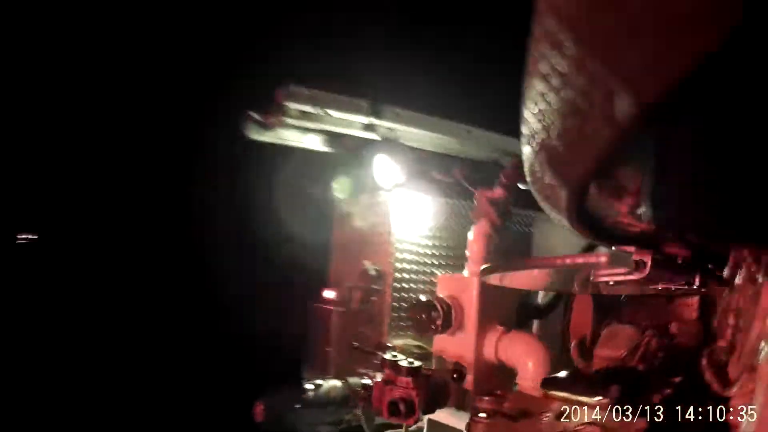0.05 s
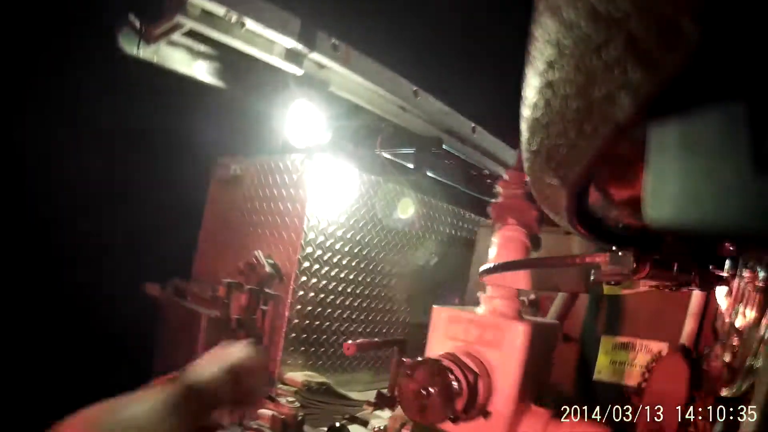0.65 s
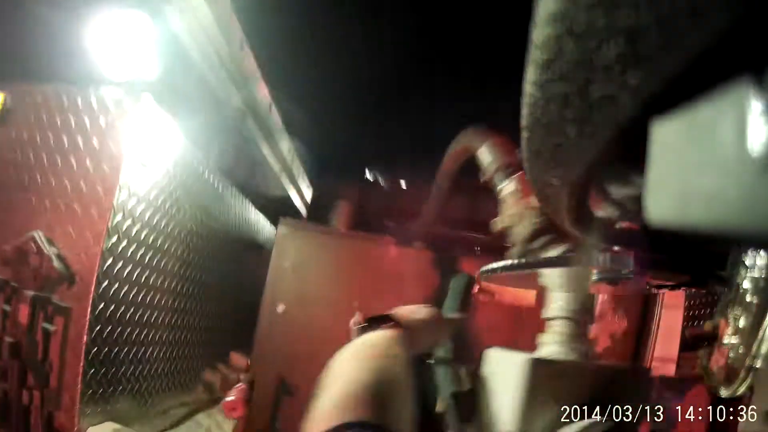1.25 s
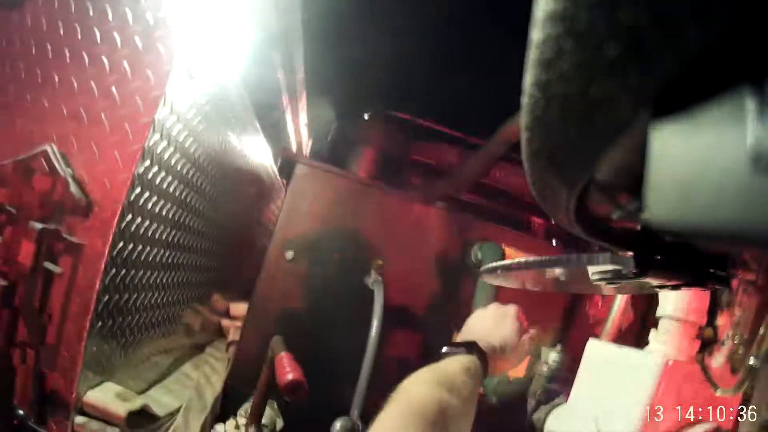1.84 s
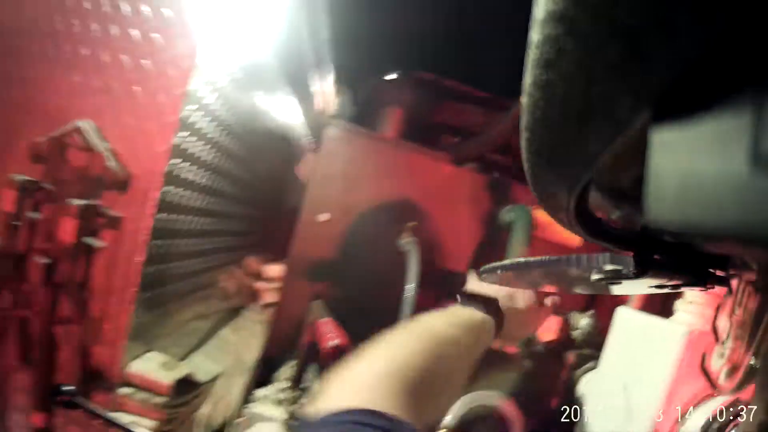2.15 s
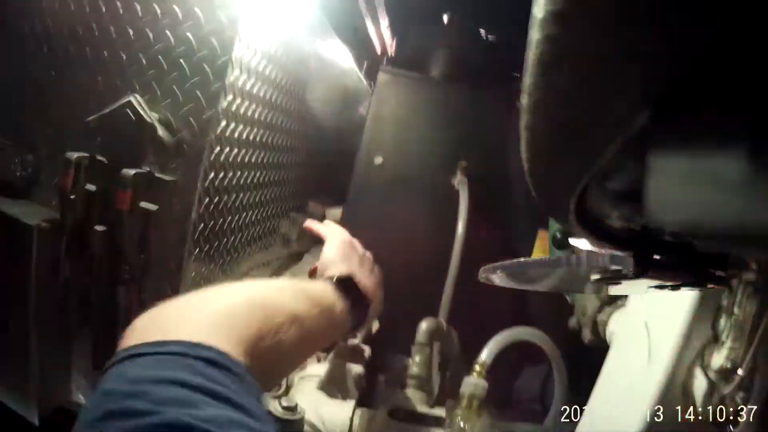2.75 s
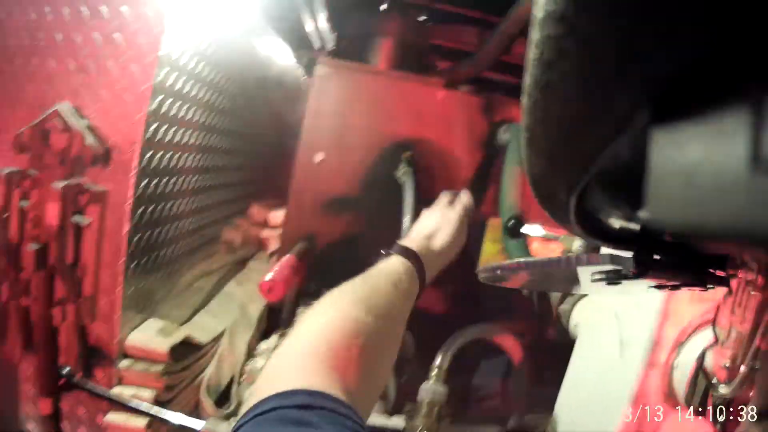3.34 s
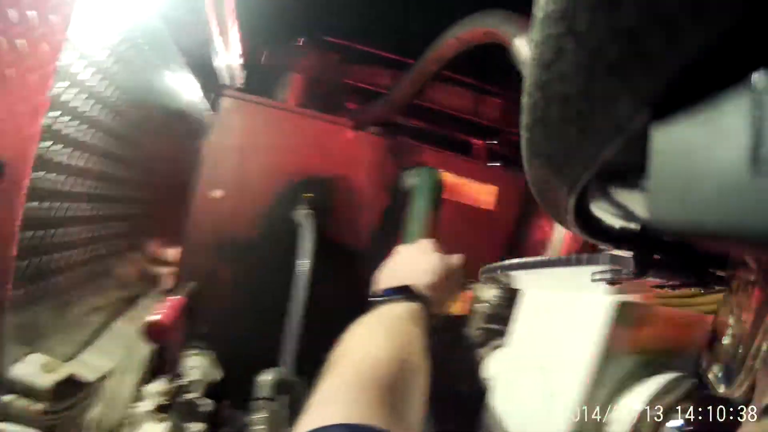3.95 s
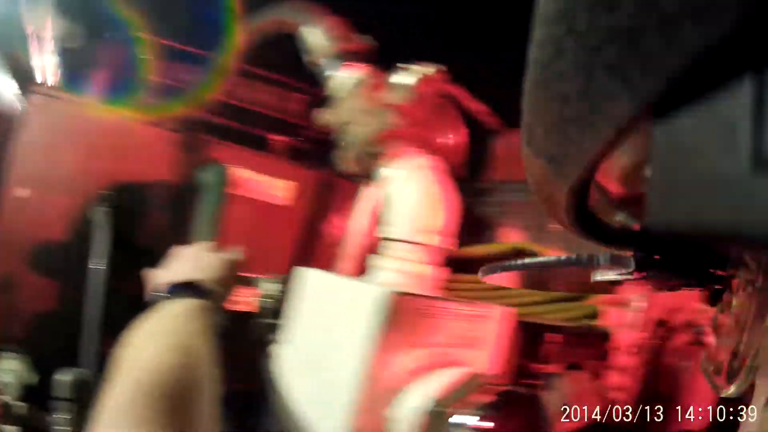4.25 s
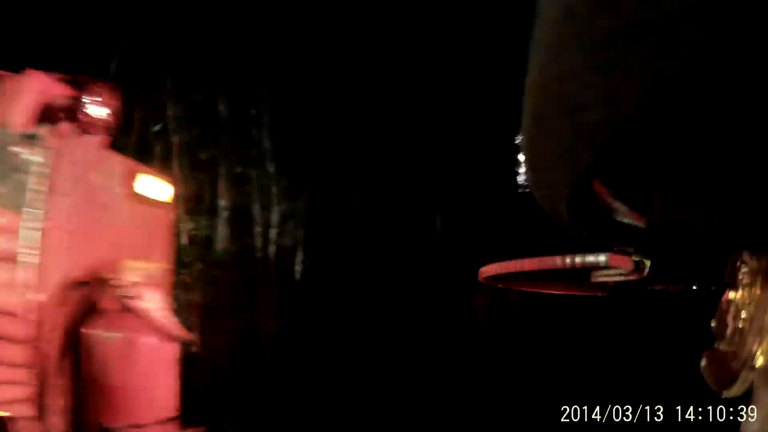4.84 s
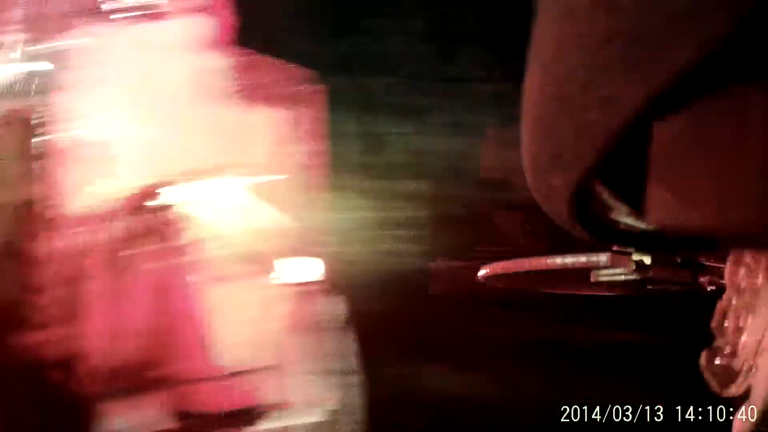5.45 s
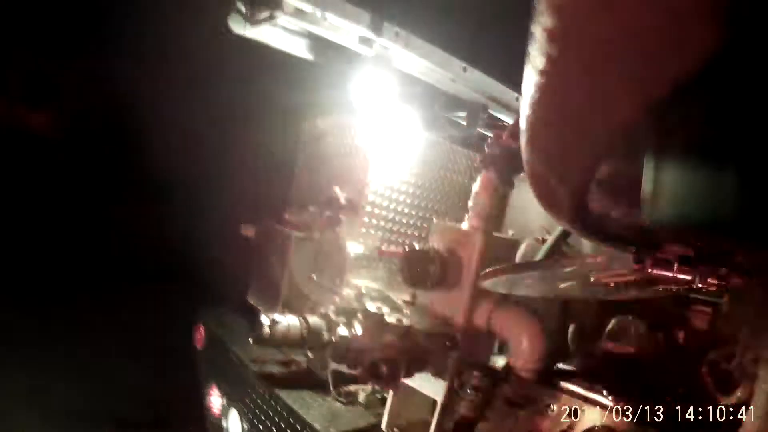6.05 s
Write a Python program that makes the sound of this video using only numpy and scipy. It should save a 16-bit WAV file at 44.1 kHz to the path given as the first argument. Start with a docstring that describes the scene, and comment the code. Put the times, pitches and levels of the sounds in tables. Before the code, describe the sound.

A small pump engine on a fire truck runs outdoors for the whole six seconds, close to a body-worn microphone. It holds one speed, making a loud, low, throbbing drone with fast metallic clatter, rushing air and a faint jingle of loose fittings. A faint hum from the pump fades by about 1.3 seconds. From then until about 4.5 seconds the engine sounds duller and its clatter softer, though the drone stays just as loud. Tiny clinks come at about 0.6 and 2.3 seconds. Around 5 seconds the exhaust gets raspier and the clatter brighter, with several light metal clinks between 4.8 and 5.6 seconds. From about 5.5 to 6 seconds gear bumps the microphone housing in a quick cluster of short, hollow knocks, the sharpest at about 5.8 seconds, while the engine runs on.

```python
"""A V-twin fire pump engine runs at a steady 2900 rpm on the back of a truck, outdoors.
Uneven firings throb in the muffler; firing knocks, valve gear and rushing air ring the engine's metal.
Loose fittings jingle and churning water rings the pump body. The body-worn microphone leans in beside
the pump, where the truck screens the engine, then swings away; loose gear knocks against its housing."""
import sys
import numpy as np
from scipy import signal
from scipy.fft import rfft, irfft
from scipy.io import wavfile
from scipy.ndimage import uniform_filter1d, map_coordinates

SR = 44100
rng = np.random.default_rng(int(sys.argv[2]) if len(sys.argv) > 2 else 0)


def wrap_up_sound(samples):
    """Save the sound to the file named by the first command line argument, as 16-bit audio."""
    columns = np.atleast_2d(samples).T
    # keep every value between -1 and 1, then stretch to whole-number steps
    tamed = np.clip(columns, -1, 1)
    steps = np.round(tamed * 32767).astype(np.int16)
    wavfile.write(sys.argv[1], SR, steps)


N = 273420
T = np.arange(N) / SR
FREQ_HZ = np.maximum(np.fft.rfftfreq(N, 1 / SR), 1)
TWIN_LAG_CYCLES = 450 / 720  # second cylinder fires 450 crank degrees after the first

# Engine speed. Each row: time in seconds, four-stroke cycle rate in Hz.
CYCLE_RATE = [(0, 24.28), (.7, 24.13), (1.3, 24.2), (1.9, 24.18), (2.5, 24.13), (4.0, 24.15), (4.7, 24.19),
              (5.3, 24.14), (6.2, 24.16)]
# Cover and pipe resonances, plus one dip. Each row: centre in Hz, width in Hz, gain at centre in dB.
COVER_MODES = [(675, 68, -5), (1342, 34, 6), (1426.5, 36, 7), (2665, 64, 4.5), (3160, 140, 4),
               (4960, 80, 1), (5500, 92, 0.5), (8400, 130, 4.5), (9800, 260, 3)]


def exhaust(cycles, bark_db, twin_share=0.4, screened_db=-41.5, open_db=-30.5,
            waver_db=0.72, flutter_db=2.5, smear_rad=2.9):
    """A strong and a weak pulse per cycle drive the muffler; high orders come out in the open. Rms 1."""
    # Note screened by the truck. Each row: multiple of the cycle rate, relative level in dB.
    screened_orders = [(1, -31.5), (2, -6.5), (3, -6.5), (4, -19), (5, 2.5), (6, -2), (7, -10), (8, -14),
                       (9, -28.5), (10, -29.5), (11, -31.5), (12, -51), (13, -31), (14, -25.5), (15, -34.5),
                       (16, -45), (17, -36.5), (18, -37.5), (19, -42), (20, -55.5), (21, -58), (22, -41.5)]
    # Note in the open. Each row: multiple of the cycle rate, relative level in dB.
    open_orders = [(1, -26.5), (2, -5), (3, -5), (4, -18.5), (5, 2), (6, -3.5), (7, -11.5), (8, -6),
                   (9, -20), (10, -13.5), (11, -11.5), (12, -49), (13, -16), (14, -24), (15, -48.5),
                   (16, -24.5), (17, -52.5), (18, -30.5), (19, -36), (20, -43), (21, -50), (22, -32)]
    # Muffler resonances, setting phase only. Each row: centre in Hz, width in Hz.
    muffler_modes = [(51, 55), (140, 60), (310, 30)]
    openness = np.clip((bark_db - screened_db) / (open_db - screened_db), 0, 1.15)
    cycle_hz = np.mean(np.array(CYCLE_RATE)[:, 1])
    burn_strength = walk(24)  # no two burns are alike
    note = 0
    for (order, behind_db), (_, clear_db) in zip(screened_orders, open_orders):
        height = order / len(open_orders)
        s = 1j * order * cycle_hz
        response = -s ** 2 * (1 + twin_share * np.exp(-2j * np.pi * order * TWIN_LAG_CYCLES))
        for hz, width_hz in muffler_modes:
            response /= s ** 2 + width_hz * s + hz ** 2
        # short waves bounce round the truck and drift in phase as the microphone moves
        drift_rad = smear_rad * height ** 2 * walk(1.527)
        db = behind_db + openness * (clear_db - behind_db)
        db = db + waver_db * burn_strength + flutter_db * height * walk(12)
        note = note + undb(db) * np.cos(2 * np.pi * order * cycles + np.angle(response) - drift_rad)
    six_cycle_rms = np.sqrt(uniform_filter1d(note ** 2, int(6 * SR / cycle_hz)))
    return note / six_cycle_rms


def clatter(cycles, slop_s=.00018, scatter_db=3.0, t60_s=0.075, rattle_db=4, rattle_cycles=.24):
    """Each blow rings its own part of the engine, slightly early or late, and rattles loose parts."""
    # Two firings, then valve gear. Each row: delay after the strong firing in cycles, relative level in dB.
    blows = [(0.032, -9.5), (.67, 2), (.19, 1.5), (.87, 2.5), (.56, -3), (.37, -6)]
    # Spectrum of the engine's metal. Each row: frequency in Hz, relative level in dB.
    metal_spectrum = [(120, -10.5), (230, 7.5), (400, -3.5), (560, -12), (680, -10), (850, -7.5), (1200, 2),
                      (1550, 2), (2050, -6.5), (2430, -24.5), (2800, -19), (3300, -20), (3800, -28.5),
                      (5450, -26), (5900, -37.5), (11000, -50.5)]
    t = T[:SR // 12]
    whole_cycles = np.arange(int(cycles[-1]) + 1)
    rings, shake = 0, 0
    for delay_cycles, db in blows:
        lateness, strength = rng.standard_normal((len(whole_cycles), 2)).T
        due_s = np.interp(whole_cycles + delay_cycles, cycles, T, right=2 * T[-1])
        starts = ((due_s + slop_s * lateness) * SR).astype(int)
        inside = (starts >= 0) & (starts < N)
        hits = np.bincount(starts[inside], undb(db + scatter_db * strength)[inside], N)
        ring = rng.standard_normal(len(t)) * decay(t, t60_s)
        rings = rings + signal.fftconvolve(hits, ring)[:N]
        shake = shake + undb(2 * db) * np.exp(-((cycles - delay_cycles) % 1) / rattle_cycles)
    rattle = np.sqrt(shake) * undb(1.1 * walk(45)) * rng.standard_normal(N)
    vibration = unit(rings) + undb(rattle_db) * unit(rattle)
    return unit(colour(vibration, metal_spectrum, COVER_MODES))


def gas_puffs(cycles, decay_cycles=0.45):
    """A turbulent puff leaves the outlet after each firing."""
    # Outlet noise. Each row: frequency in Hz, relative level in dB.
    gas_spectrum = [(25, -15), (90, 3.5), (210, 3), (300, 4.5), (450, -6), (560, -8), (680, -14),
                    (780, -12.5), (1100, -17), (2500, -35), (8000, -60.5)]
    first = np.exp(-(cycles % 1) / decay_cycles)
    second = np.exp(-((cycles - TWIN_LAG_CYCLES) % 1) / decay_cycles)
    return unit(colour((first + second) * rng.standard_normal(N), gas_spectrum))


def tailpipe_growl(cycles, hz=460, width_hz=220, level_db=-43, facing_s=5, spread_s=0.36):
    """Gas puffs ring the tailpipe, swelling as the microphone passes its mouth."""
    facing = np.exp(-.5 * ((T - facing_s) / spread_s) ** 2)
    return undb(level_db) * facing * resonate(gas_puffs(cycles), hz, width_hz)


def cooling_air(cycles, pulse_db=1.35, flicker_db=2.0):
    """Air rushes through the fins, swelling slightly once a cycle."""
    # Fin noise. Each row: frequency in Hz, relative level in dB.
    air_spectrum = [(700, 9), (1100, 18.5), (1500, 23), (2050, 22), (2450, 4), (2900, 8), (3850, 0.5),
                    (5400, 3), (5900, 0.5), (6500, 0.5), (8000, -9.5), (10000, -10.5), (11500, -18),
                    (15000, -16.5)]
    swell_db = pulse_db * np.cos(2 * np.pi * cycles) + flicker_db * walk(30)
    return unit(colour(rng.standard_normal(N) * undb(swell_db), air_spectrum, COVER_MODES))


def housing_knocks(scuff_db=-3, scuff_t60_s=0.057, low_cut_hz=480, rebound_s=.0095, rebound_db=-12):
    """Gear rings the microphone housing, scuffs it and rebounds once; softer contact is duller."""
    # Bumps. Each row: start in seconds, peak in dB, contact low-pass corner in Hz.
    bumps = [(5.554, -23, 2500), (5.663, -22.5, 2500), (5.692, -17, 5000), (5.751, -16.5, 2000),
             (5.8405, -17, 1790), (5.8465, -6.5, 3040), (5.865, -21.5, 900), (5.906, -21.5, 300),
             (6.048, -15, 5000)]
    # Housing modes. Each row: frequency in Hz, relative level in dB, T60 in seconds.
    housing_modes = [(598, 5.5, 0.033), (673, 7, 0.02), (785, 4, 0.13), (995, 2.5, .03), (1277, 7, 0.054),
                     (1395, 8.5, 0.031), (1540, 3.5, .03), (1716, 5.5, 0.031), (1960, 2, 0.024),
                     (2750, -7.5, 0.018), (4860, -2.5, 0.013)]
    t = T[:SR // 6]
    out = np.zeros(N + len(t))
    ring = sum((-1) ** k * undb(db) * decay(t, t60_s) * np.sin(2 * np.pi * hz * t)
               for k, (hz, db, t60_s) in enumerate(housing_modes))
    low_cut = signal.butter(4, low_cut_hz, "high", fs=SR, output="sos")  # small shell, no bass
    for start_s, peak_db, corner_hz in bumps:
        contact = signal.butter(1, corner_hz, fs=SR)
        for bounce in range(2):
            scuff = undb(scuff_db) * rng.standard_normal(len(t)) * decay(t, scuff_t60_s)
            shell = signal.sosfilt(low_cut, ring + scuff)
            bump = signal.lfilter(*contact, signal.lfilter(*contact, shell))
            place(out, bump, start_s + bounce * rebound_s, peak_db + bounce * rebound_db)
    return out[:N]


def whine(cycles, order=56, throb_db=3.5, waver_db=5.5, wander_rad=0.73):
    """A thin metallic note locked to the crankshaft throbs once a cycle and wavers."""
    db = throb_db * np.cos(2 * np.pi * cycles) + waver_db * walk(9)
    return unit(undb(db) * np.sin(2 * np.pi * order * cycles + wander_rad * walk(8)))


def pump_hum(hz=774, width_hz=60, level_db=-49, screened_s=1.22, fade_s=.25):
    """Churning water rings the pump body; it fades as the microphone leans past the front."""
    in_view = np.clip((screened_s - T) / fade_s + .5, 0, 1)
    return undb(level_db) * in_view * resonate(rng.standard_normal(N), hz, width_hz)


def chinks(t60_s=0.078, chatter_s=0.0081, chatter_db=-20):
    """A shaken fitting strikes, chatters briefly and rings on at one pitch."""
    # Loudest strikes. Each row: start in seconds, pitch in Hz, peak in dB.
    strikes = [(.63, 3160, -42), (2.312, 3160, -42.5), (4.82, 2665, -44), (5.14, 2665, -41),
               (5.271, 2665, -39), (5.391, 3160, -36), (5.609, 3160, -38)]
    t = T[:SR // 5]
    out = np.zeros(N + len(t))
    for start_s, hz, peak_db in strikes:
        chatter = undb(chatter_db) * rng.standard_normal(len(t)) * np.exp(-t / chatter_s)
        force = (t == 0) + chatter
        ring = np.sin(2 * np.pi * hz * t) * decay(t, t60_s)
        place(out, signal.fftconvolve(force, ring)[:len(t)], start_s, peak_db)
    return out[:N]


def jingle(hits_per_s=34, scatter_db=4.0, t60_s=0.045, together_db=1.5):
    """Small loose parts ring at random, each at its own pitch; stronger shakes lift them all."""
    # Loose parts. Each row: pitch in Hz, relative level in dB.
    parts = [(2665, -6.5), (2800, -5), (3020, -10.5), (3160, -1.5), (3270, -11), (4350, -14.5), (4620, -14),
             (5010, -10), (5480, -12), (5580, -8.5)]
    t = T[:SR // 8]
    shaking = undb(together_db * walk(24))
    out = 0
    for hz, db in parts:
        struck = rng.random(N) < hits_per_s / SR
        hits = struck * undb(scatter_db * rng.uniform(-0.86, 1, N)) * shaking
        ring = np.sin(2 * np.pi * hz * t) * decay(t, t60_s)
        out = out + undb(db) * unit(signal.fftconvolve(hits, ring)[:N])
    return out


def panel_echoes(direct, count=4, echo_db=-22, spacing_s=.0015, sway_s=.0004):
    """Direct sound plus weak echoes off the truck's panels; paths shift as the microphone moves."""
    out = direct
    for k in range(1, count + 1):
        delay_s = k * spacing_s + sway_s * walk(1.2)
        out = out + undb(echo_db) * map_coordinates(direct, [(T - delay_s) * SR], order=3)
    return out


def undb(db):
    """Decibels to gain."""
    return 10 ** (np.asarray(db) / 20)


def unit(x):
    """Scale to rms 1."""
    return x / np.sqrt(np.mean(x ** 2))


def decay(t, t60_s):
    """Envelope falling 60 dB in t60_s."""
    return undb(-60 * t / t60_s)


def place(out, event, start_s, peak_db):
    """Add an event to out at the given peak level."""
    start = int(start_s * SR)
    out[start:start + len(event)] += undb(peak_db) * event / np.abs(event).max()


def curves(table):
    """Interpolate each later column over the times in the first."""
    times_s, *columns = np.transpose(table)
    return [np.interp(T, times_s, column) for column in columns]


def walk(rate_hz):
    """Random steps at rate_hz, smoothed twice; spread near 1."""
    hold = int(SR / rate_hz)
    steps = np.repeat(rng.standard_normal(N // hold + 1), hold)
    return 1.02 * uniform_filter1d(uniform_filter1d(steps, hold), hold)[:N]


def colour(x, spectrum, modes=()):
    """Filter by a smooth spectrum with resonances on top."""
    hz, db = np.transpose(spectrum)
    gain = undb(np.interp(np.log(FREQ_HZ), np.log(hz), db)) + 0j
    for centre_hz, width_hz, rise_db in modes:
        detuning = (FREQ_HZ ** 2 - centre_hz ** 2) / (width_hz * FREQ_HZ)
        gain *= 1 + (undb(rise_db) - 1) / (1 + 1j * detuning)
    return irfft(rfft(x) * gain, N)


def resonate(x, hz, width_hz):
    """Two passes through one resonance, scaled to rms 1."""
    band = signal.iirpeak(hz, hz / width_hz, fs=SR)
    return unit(signal.lfilter(*band, signal.lfilter(*band, x)))


def scene(first_firing_s=.0285, drone_trim_db=0.5, metal_trim_db=0.69, whine_db=-13.0,
          gas_over_hiss_db=25.5, air_over_hiss_db=21.0, jingle_over_hiss_db=7.0):
    """One crankshaft times exhaust, metal and air; gas, air and jingle are screened alike."""
    # Exhaust drone; long waves bend round the truck. Each row: time in seconds, level before trim in dB.
    drone_levels = [(0, -17.5), (0.95, -17), (1.5, -17.8), (2.15, -18.5), (2.4, -17.5), (2.95, -17.5),
                    (3.95, -18.5), (4.45, -17), (4.85, -18), (5.35, -17.5), (5.85, -19), (6.2, -19)]
    # The truck screens the engine, then uncovers it. Each row: time in seconds,
    # exhaust bark in dB (sets timbre only), metal level before trim in dB, hiss base level in dB.
    screening = [(0, -26.5, -28.5, -61), (0.42, -32, -34, -63.5), (0.64, -32.5, -31.5, -67),
                 (1.35, -38.5, -39, -69.5), (2.15, -41, -40.5, -69), (2.35, -40.5, -39, -68.5),
                 (3.0, -39.5, -37.5, -67.5), (3.8, -41, -40, -68.5), (4.7, -37.5, -37.5, -64),
                 (5.33, -31, -35, -59.5), (5.65, -33.5, -32, -62), (6.2, -28, -33.5, -64)]
    cycle_hz, = curves(CYCLE_RATE)
    drone_db, = curves(drone_levels)
    bark_db, metal_db, hiss_db = curves(screening)
    cycles = np.cumsum(cycle_hz) / SR - first_firing_s * cycle_hz[0]
    outlet = undb(drone_db + drone_trim_db) * exhaust(cycles, bark_db)
    outlet += undb(hiss_db + gas_over_hiss_db) * gas_puffs(cycles)
    block = undb(metal_db + metal_trim_db) * (clatter(cycles) + undb(whine_db) * whine(cycles))
    block += undb(hiss_db + air_over_hiss_db) * cooling_air(cycles)
    block += undb(hiss_db + jingle_over_hiss_db) * jingle()
    block += chinks()
    return (outlet + tailpipe_growl(cycles) + pump_hum() + panel_echoes(block) + housing_knocks())[None]


def record(dry, hiss_db=-75, top_hz=15300):
    """The recorder adds faint, even hiss and cuts the top."""
    hiss = undb(hiss_db) * rng.standard_normal(dry.shape)
    low_pass = signal.ellip(8, .2, 70, top_hz, fs=SR, output="sos")
    return signal.sosfilt(low_pass, dry + hiss)


dry = scene()
out = record(dry)
wrap_up_sound(out)
```